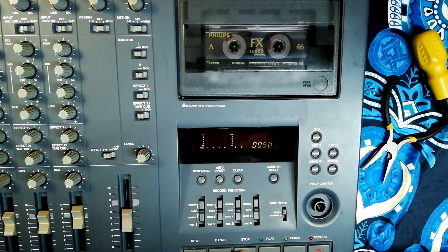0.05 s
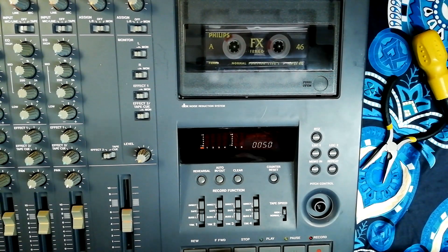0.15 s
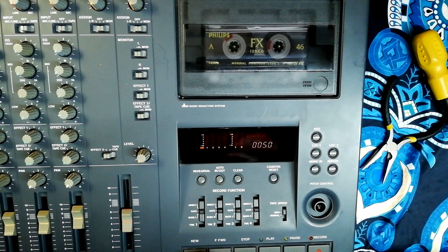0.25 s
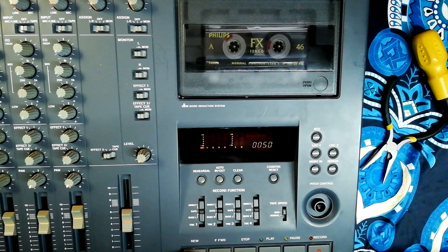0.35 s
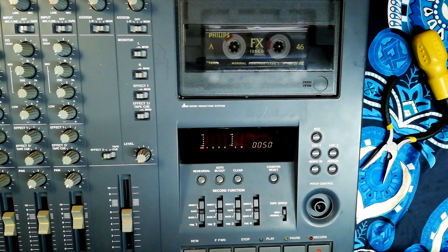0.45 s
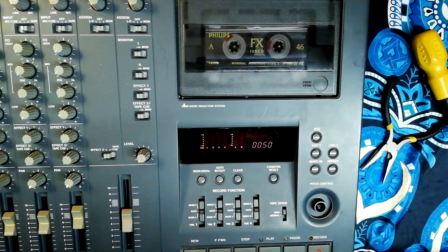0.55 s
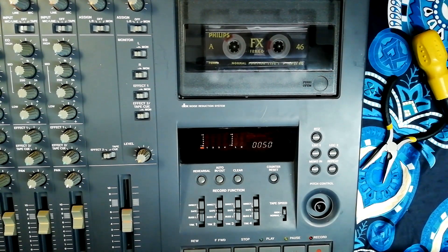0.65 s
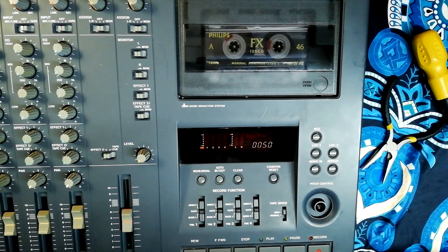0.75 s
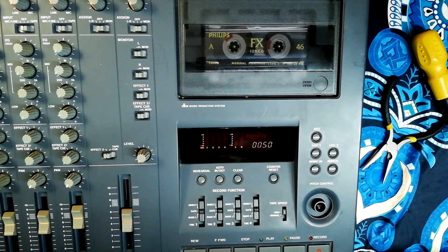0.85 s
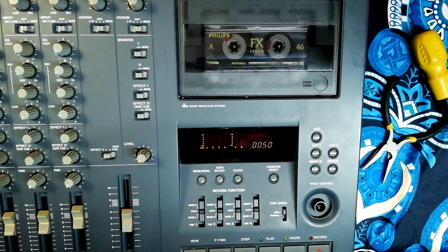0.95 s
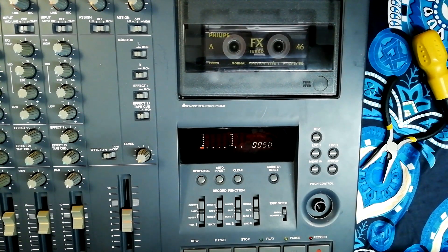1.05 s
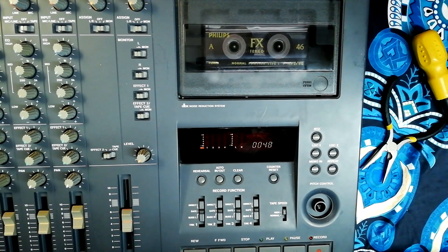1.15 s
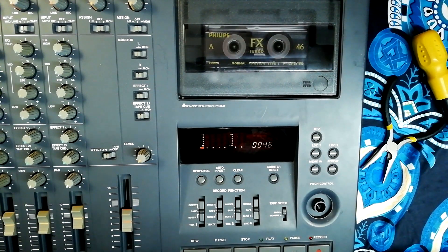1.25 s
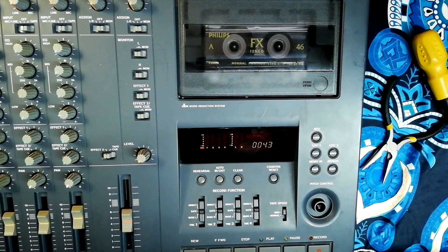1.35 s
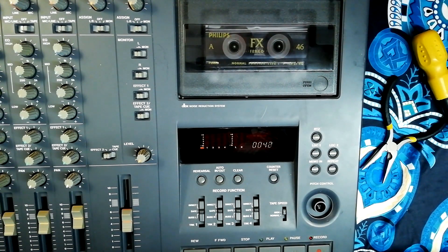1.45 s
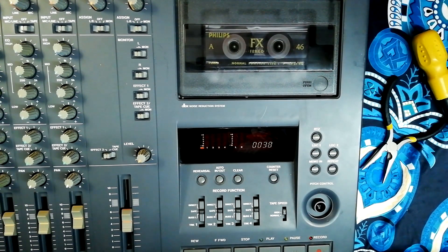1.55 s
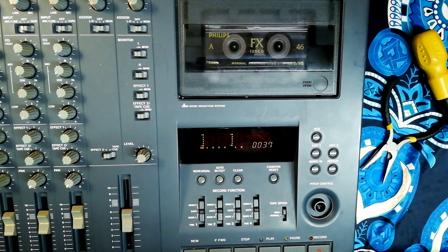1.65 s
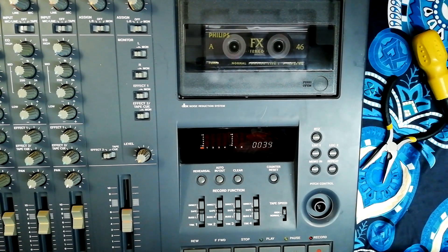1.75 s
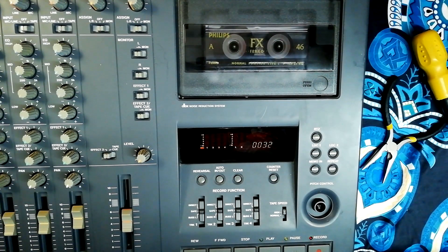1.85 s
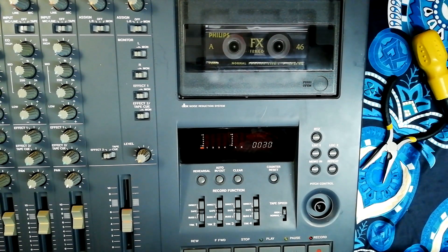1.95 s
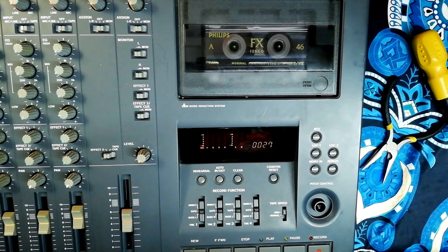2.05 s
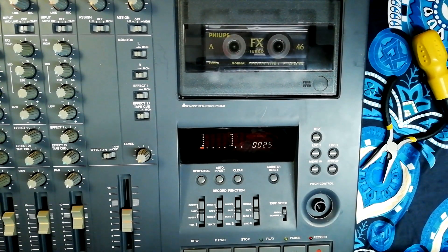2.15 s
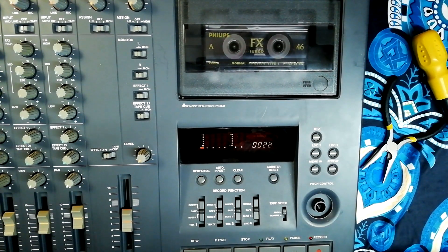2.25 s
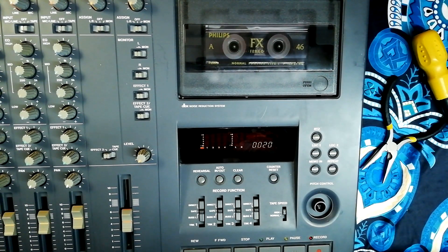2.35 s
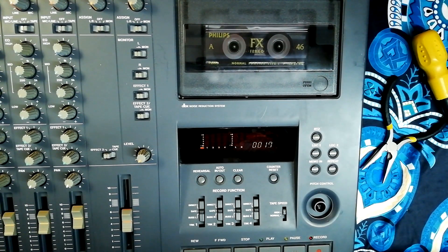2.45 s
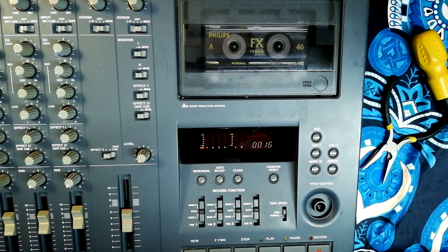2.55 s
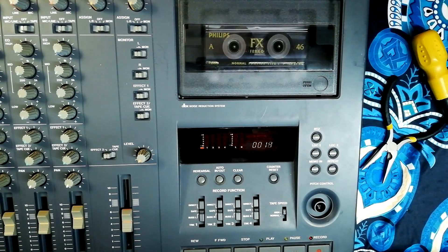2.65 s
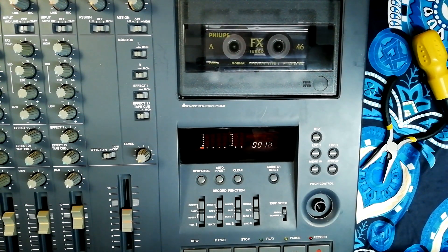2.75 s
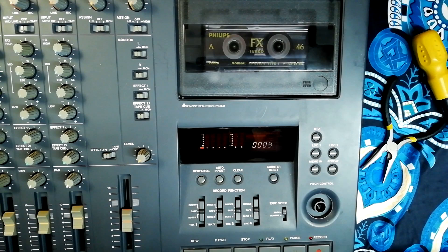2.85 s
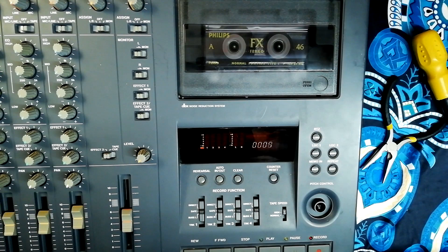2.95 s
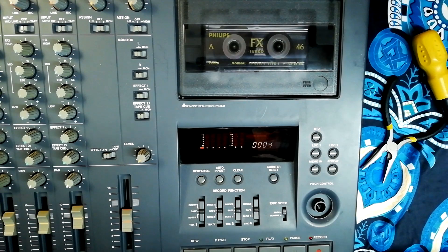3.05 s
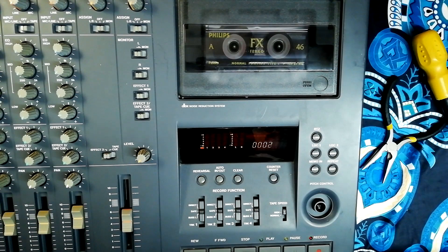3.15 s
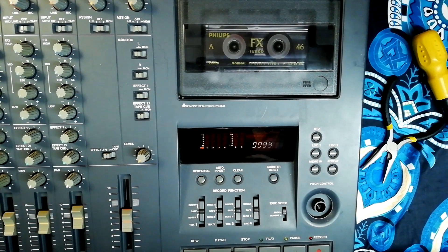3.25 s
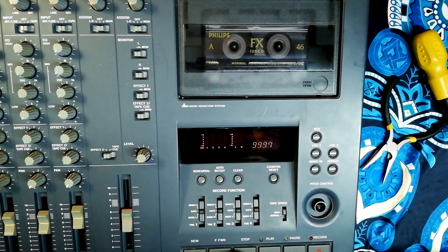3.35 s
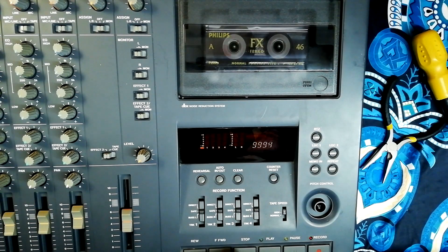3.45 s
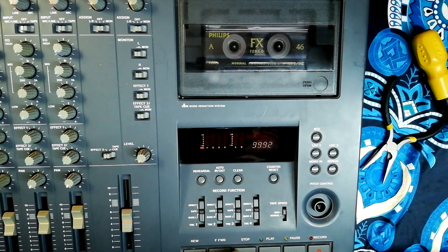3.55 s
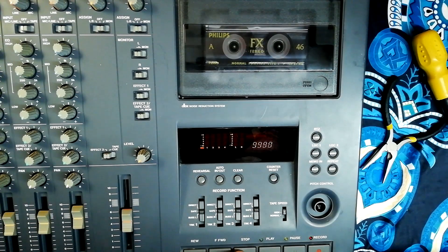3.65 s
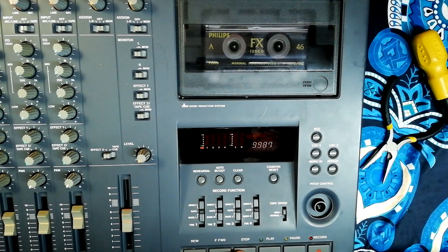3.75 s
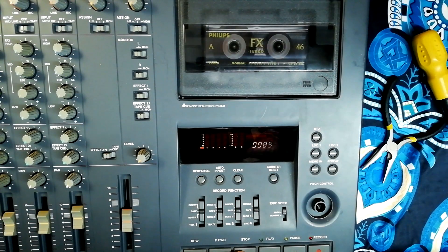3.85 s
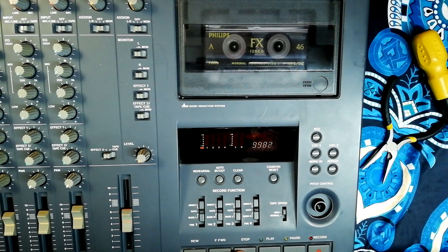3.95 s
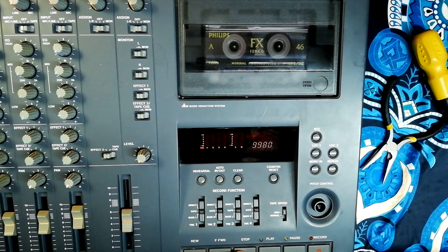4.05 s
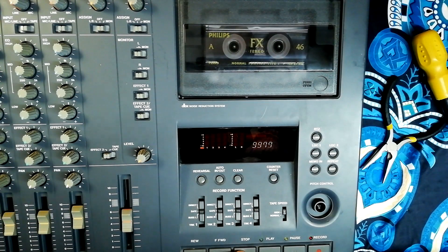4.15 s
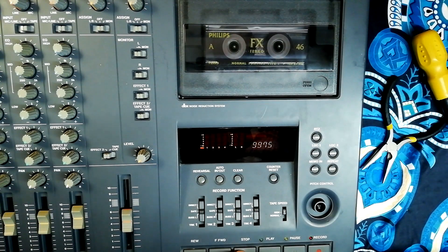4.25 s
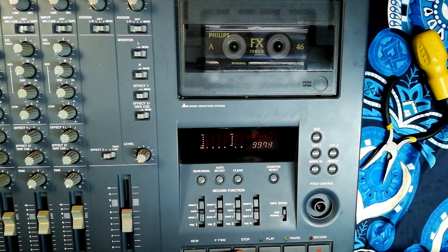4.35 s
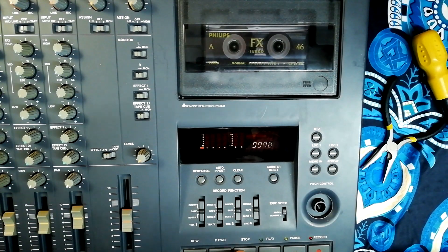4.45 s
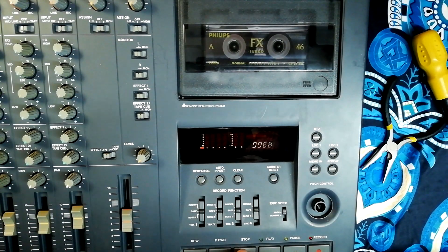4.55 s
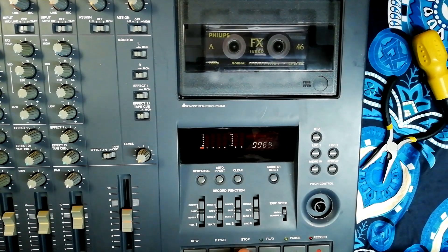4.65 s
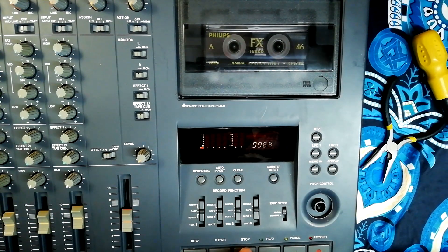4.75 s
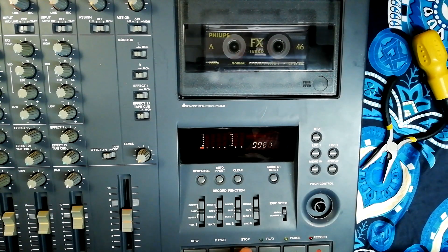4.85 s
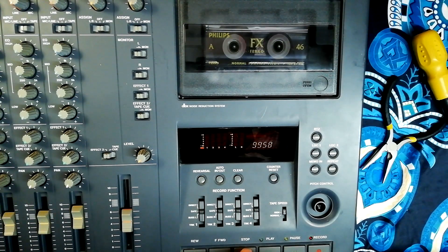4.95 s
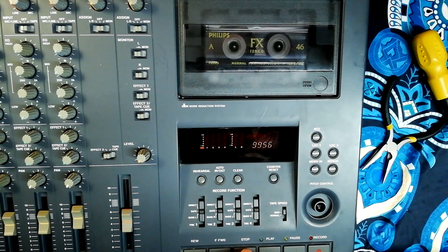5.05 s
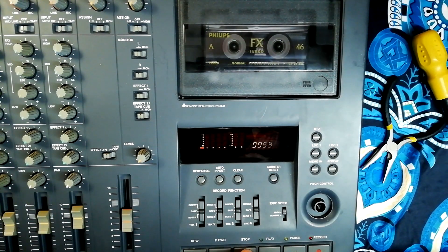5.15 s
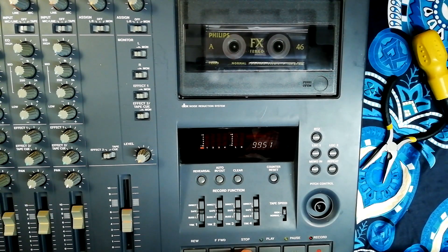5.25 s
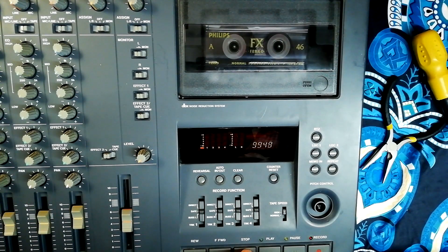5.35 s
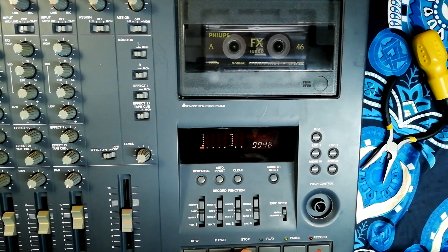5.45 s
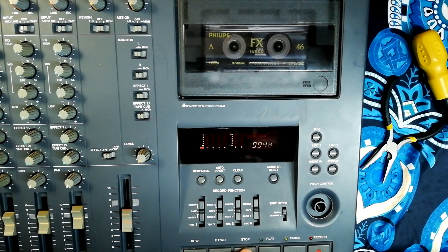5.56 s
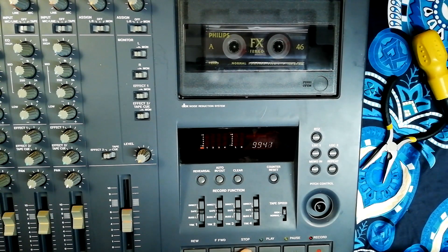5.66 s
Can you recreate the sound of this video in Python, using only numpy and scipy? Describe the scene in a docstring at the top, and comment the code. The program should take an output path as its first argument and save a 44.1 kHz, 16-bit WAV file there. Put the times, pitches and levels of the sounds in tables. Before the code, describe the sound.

A cassette recorder's keys click and clunk, then the tape rewinds with a faint, steady whir in a quiet room.

```python
"""A capstan motor whines for an instant, then a key clacks and stops the tape: a cassette deck
in a quiet room, close to a stereo microphone. Keys, latches and the head carriage knock in the
plastic case, the wind gear scrapes in, and the tape rewinds with a faint whir of gears, hubs
and hiss. The whir slowly brightens as the hubs grow louder, the sound of a reel gaining speed."""
import sys
import numpy as np
from scipy import signal
from scipy.fft import rfft, irfft
from scipy.io import wavfile
from scipy.ndimage import uniform_filter1d

SR = 44100
rng = np.random.default_rng(int(sys.argv[2]) if len(sys.argv) > 2 else 0)


def generate_wav(sig):
    """Save sig (samples, or channels by samples) to the path in sys.argv[1] as 16-bit PCM at SR."""
    pcm = np.round(np.clip(np.atleast_2d(sig).T, -1, 1) * 32767).astype(np.int16)
    wavfile.write(sys.argv[1], SR, pcm)


N = 251347
TIME = np.arange(N) / SR
REWIND_START_S = 1.29

# spectra of the room's still air and of the return from its walls: frequency_hz, gain_db
AIR_SPECTRUM = [(20, -13), (50, -2), (120, -5.5), (250, 0), (420, -7), (560, -11), (700, 1), (1300, 0),
                (3000, -6), (7000, -8.5), (9300, -6.5), (12000, -13.5), (16000, -14)]
WALL_SPECTRUM = [(100, -5.5), (400, 3), (800, -1), (2000, 2.5), (10500, -2.5), (12500, -7), (16000, -7)]
# steady hum in the room: pitch_hz, level_db
HUM_TONES = [(120, -72.5), (400.6, -79), (446.3, -70)]
# partials of the capstan motor in play and in rewind, and of the reel motor: harmonic, level_db
CAPSTAN_PLAY_PARTIALS = [(1, -58), (2, -53), (3, -56.5), (4, -62), (5, -77), (6, -63.5), (7, -78)]
CAPSTAN_IDLE_PARTIALS = [(1, -72.5), (2, -68), (4, -72.5), (6, -76)]
REEL_MOTOR_PARTIALS = [(2, -67), (4, -79)]
# spectra of running tape, sliding levers and struck plastic: frequency_hz, gain_db
TAPE_SPECTRUM = [(150, -10), (400, 2.5), (550, -8.5), (800, -4.5), (1120, -10.5), (1550, -1), (2950, -2.5),
                 (3600, 0), (5900, -3), (7200, -1.5), (8300, -1), (9800, 1), (11200, -8.5), (16000, -16)]
SCRAPE_SPECTRUM = [(200, -15), (450, -11), (750, -4.5), (1400, -2), (2000, -6.5), (3400, -7.5),
                   (5600, -6.5), (9400, 2), (11500, -8), (16000, -23)]
CRACK_SPECTRUM = [(400, -19), (1000, -8), (2200, -5.5), (2900, -15), (3600, -4.5), (5000, -9.5),
                  (5900, -13), (7300, -3.5), (8400, -3), (9700, 2.5), (11200, -3), (13000, -7.5),
                  (16000, -17)]
# spectrum of the shaking case: multiple_of_centre, gain_db
THUD_SPECTRUM = [(.17, -41), (.33, -10), (.55, -4.5), (1.0, -3), (1.5, -5), (2.2, -11), (3.3, -11.5),
                 (6.5, -39)]
# resonances of the deck's parts: pitch_hz, width_hz, gain_db, left_minus_right_db
GEAR_MODES = [(649, 25, -11, -25.5), (1354, 94, -0.5, 2.5), (1530, 97, -2, -1), (1750, 54, -3.5, -3),
              (2019, 25.3, 3.5, 14), (2570, 35, -8, 18), (2713, 16, 1.5, 1)]
HUB_MODES = [(4180, 48, -6.5, -3), (4640, 67, -6.5, -7), (5150, 26, -6, -3), (5460, 55, -5.5, -4),
             (6495, 89, 3, 1.5), (6960, 64, -2.5, -3), (7115, 31, 0, 1), (7720, 96, -2.5, 5),
             (9400, 260, -31, 7), (9590, 380, -22.5, 32)]
TAPE_EDGE_MODES = [(3255, 100, -5, 2), (3465, 95, -1, -9), (3550, 110, -9, -7)]
CHASSIS_MODES = [(650, 50, -11, -10), (876, 100, -3.5, -4), (1003, 69, 0.5, 0), (1355, 61, 4, 1.5),
                 (1706, 66, -5.5, -4), (1767, 53, -4.5, -1), (2024, 83, -11.5, -9), (2350, 110, -11.5, 3)]
KEY_MODES = [(1930, 104, 5.5, -4), (2443, 99, 0, -5), (2810, 150, 0, 4.5), (3280, 170, 1.5, -6),
             (3770, 240, -2, -1), (4530, 140, -7.5, -14), (4890, 170, -1, 7), (7300, 210, -5.5, -9)]
LATCH_SPRING_MODES = [(9100, 140, -12, 14), (9580, 110, 3, 13), (10250, 130, -4.5, 13)]
# swells of the tape edge rubbing on the cassette shell: peak_s, level_db
EDGE_RUBS = [(4.93, -57.5), (5.41, -58)]
# the loudest knocks of a hub in the shell: start_s, relative_level_db
HUB_KNOCKS = [(1.885, -46), (1.911, -38), (3.186, -39.5), (4.275, -48)]
# levers and the wind gear sliding into place: start_s, length_s, scrape_db, chassis_db
LEVER_SLIDES = [(0.1510, 0.0085, -22, -50), (0.225, 0.015, -34, -50), (0.491, 0.014, -37.5, -39),
                (0.982, 0.013, -30.5, -41), (1.2644, 0.03, -26, -48), (1.322, 0.013, -37.5, -40)]
# blows of keys and latches: start_s, case_thud_db, chassis_knock_db, key_ring_db, crack_db, fade_ms
KEY_BLOWS = [(0.1252, -44.5, -39, -26, -26.5, 1.65), (0.155, -32, -29, -29.5, -15.5, 5.7),
             (0.1988, -34.5, -19.5, -40, -17.5, 4.6), (0.2997, -37.5, -44.5, -55, -44, 3.8),
             (0.4775, -68, -61, -48.5, -47.5, 4), (0.5141, -38.5, -39, -39, -37, 3.2),
             (0.7549, -43.5, -33, -27, -25.5, 4), (0.8160, -45.5, -57, -46.5, -50, 5.1),
             (0.9511, -38.5, -34.5, -40.5, -38.5, 3), (0.9895, -31.5, -23, -24, -16.5, 5.6),
             (1.0053, -41, -28, -34.5, -43, 5.4), (1.3075, -36, -52, -50, -36, 1.8),
             (1.3621, -36.5, -33.5, -43.5, -39, 2.6)]


def undb(db):
    """Decibels to gain."""
    return 10 ** (np.asarray(db) / 20)


def unit(x):
    """Scale to rms 1."""
    return x / np.sqrt(np.mean(x ** 2))


def pan(db):
    """Left and right gains, the left louder by db."""
    return undb(np.array([[db], [-db]]) / 2)


def drift(rate_hz):
    """Smooth random drift with a spread near 1."""
    hold = max(int(SR / rate_hz), 2)
    steps = np.repeat(rng.standard_normal(N // hold + 1), hold)
    return unit(uniform_filter1d(uniform_filter1d(steps, hold), hold)[:N])


def wavering_sine(hz, spread, drift_hz):
    """A cycle whose rate wanders around hz."""
    return np.sin(2 * np.pi * np.cumsum(hz * (1 + spread * drift(drift_hz))) / SR)


def noise_pair(side_db, size=N):
    """Left and right noise with a common part and an opposed part."""
    mid, side = rng.standard_normal((2, size))
    return unit(np.array([mid + undb(side_db) * side, mid - undb(side_db) * side]))


def colour(x, spectrum, size=2048):
    """Minimum-phase filter with the given spectrum."""
    hz, db = np.transpose(spectrum)
    bins_hz = np.maximum(np.fft.rfftfreq(size, 1 / SR), 1)
    cepstrum = irfft(np.log(undb(np.interp(np.log(bins_hz), np.log(hz), db))))
    cepstrum[1:size // 2] *= 2
    cepstrum[size // 2 + 1:] = 0
    impulse = irfft(np.exp(rfft(cepstrum)))
    return signal.fftconvolve(x, impulse[None], axes=1)[:, :x.shape[1]]


def ring(x, modes):
    """Resonances in parallel, neighbours in opposite phase, each leaning to one side."""
    out = 0
    for k, (hz, width_hz, db, pan_db) in enumerate(modes):
        mode = signal.lfilter(*signal.iirpeak(hz, hz / width_hz, fs=SR), x)
        out += (-1) ** k * undb(db) * pan(pan_db) * mode
    return out


def excite(noise, force, modes):
    """Noise rings the modes; a steady force of 1 gives rms 1."""
    return ring(noise * (force + 1e-18), modes) / np.std(ring(noise, modes))


def room_tone():
    """Still air around the microphone, a low rumble alike on both sides, and a faint hum."""
    rumble = signal.sosfilt(signal.butter(2, 230, fs=SR, output="sos"), rng.standard_normal(N))
    air = unit(colour(noise_pair(-0.47) + 4 * rumble, AIR_SPECTRUM))
    hum = sum(undb(db + 2.3 * drift(9)) * np.sin(2 * np.pi * hz * TIME) for hz, db in HUM_TONES)
    return undb(-58.5) * air + np.sqrt(2) * hum


def room_reverb(x, tail_t60_s=0.3, boom_t60_s=0.59):
    """Near walls return a short tail with a soft top; one low room mode hangs on."""
    t = TIME[:SR]
    onset = np.clip((t - 0.004) / 0.00099, 0, 1)
    reflections = unit(noise_pair(0.95, SR) * onset * 1000 ** (-t / tail_t60_s))
    tail = undb(-10) * colour(reflections, WALL_SPECTRUM)
    low_mode = ring(noise_pair(-13, SR) * onset * 1000 ** (-t / boom_t60_s), [(214, 65, 0, 0.01)])
    boom = undb(-1) * np.sqrt(np.pi * 45 / SR) * unit(low_mode)
    return signal.fftconvolve(x, (tail + boom) / np.sqrt(SR), axes=1)[:, :N]


def housing(x, inside_db, fade_s, size=1024):
    """Sound rebounds inside the casing and leaves it by other paths to the left and to the right."""
    rebounds = unit(noise_pair(0, size) * np.exp(-TIME[:size] / fade_s))
    paths = undb(inside_db) * rebounds / np.sqrt(size)
    paths[:, 0] += 1  # straight to the microphone
    return signal.fftconvolve(x, paths, axes=1)[:, :N] / np.sqrt(1 + undb(inside_db) ** 2)


def motor_whine(hz, partials, wow, flutter):
    """A small motor whose speed wavers, slowly (wow) and quickly (flutter)."""
    phase = 2 * np.pi * np.cumsum(hz * (1 + wow * drift(4) + flutter * drift(70))) / SR
    return np.sqrt(2) * sum(undb(db + 1.9 * drift(25.2)) * np.sin(k * phase + rng.uniform(0, 2 * np.pi))
                            for k, db in partials)


def tape_playing(stop_s=0.12, run_down_s=0.028):
    """The capstan draws the tape past the head until the stop key lifts it."""
    running = np.exp(-np.maximum(TIME - stop_s, 0) / run_down_s)
    head_rub = undb(-52.5) * unit(colour(noise_pair(-1.3), TAPE_SPECTRUM))
    capstan = motor_whine(434.5, CAPSTAN_PLAY_PARTIALS, wow=0.0034, flutter=0.0095)
    return running * (capstan + head_rub)


def tape_rewinding(spin_up_s=0.059, surge_db=11, surge_fade_s=0.095, rub_half_s=0.051):
    """Gears rattle, hubs chatter once a turn, tape hisses and scrapes its edge, two motors whine."""
    age_s = np.maximum(TIME - REWIND_START_S, 0)
    # a surge while the slack is taken up
    surge = undb(surge_db * np.exp(-np.maximum(age_s - spin_up_s, 0) / surge_fade_s))
    drive = np.minimum(age_s / spin_up_s, 1) * surge
    reel = wavering_sine(hz=21.17, spread=0.0554, drift_hz=2.05)
    pulley = wavering_sine(hz=37, spread=0.024, drift_hz=3.76)
    gears = unit(ring(noise_pair(-11) * undb(3.9 * pulley + 1.05 * drift(60)), GEAR_MODES))
    hub_chatter = noise_pair(-8.5) * undb(1.9 * reel + 1.3 * drift(20) + 2.8 * drift(400))
    hubs = unit(ring(hub_chatter, HUB_MODES))
    edge_friction = noise_pair(-1.5) * undb(4.6 * wavering_sine(hz=70, spread=0.195, drift_hz=30))
    edge = unit(ring(edge_friction, TAPE_EDGE_MODES))
    tape_friction = noise_pair(1) * undb(0.45 * reel + 1.5 * drift(29.88) + 1.6 * drift(900))
    hiss = unit(housing(colour(tape_friction, TAPE_SPECTRUM), inside_db=-8, fade_s=0.005)) * pan(1.7)
    # the emptying reel grows louder, and the edge scrapes harder as the pack grows
    hub_gain = undb(-61.84 + 1.676 * age_s)
    hiss_gain = undb(-52.1 + 0.5145 * age_s)
    swells = sum(undb(db) * np.exp(-((TIME - peak_s) / rub_half_s) ** 2) for peak_s, db in EDGE_RUBS)
    edge_gain = undb(-75.5 + 3.5 * age_s) + swells
    whir = undb(-58.5) * gears + hub_gain * hubs + edge_gain * edge + hiss_gain * hiss
    reel_motor = motor_whine(691, REEL_MOTOR_PARTIALS, wow=0.006, flutter=0.011) * undb(3 * pulley)
    capstan = motor_whine(427.5, CAPSTAN_IDLE_PARTIALS, wow=0.00297, flutter=0.00885)
    return drive * (whir + reel_motor + capstan)


def hub_ticks(faint_per_s=3.3, fade_s=0.0018):
    """Now and then a hub knocks against the shell and rings briefly; fainter knocks come at random."""
    count = int(faint_per_s * (TIME[-1] - REWIND_START_S))
    faint = [(rng.uniform(REWIND_START_S, TIME[-1]), rng.uniform(-54, -48)) for _ in range(count)]
    contact = sum(undb(db) * np.exp(-np.maximum(TIME - start_s, 0) / fade_s) * (TIME >= start_s)
                  for start_s, db in HUB_KNOCKS + faint)
    return undb(2) * excite(noise_pair(-1), contact, HUB_MODES)


def lever_slides(rise_share=0.44, fade_s=0.0075):
    """Levers and the wind gear grate as they slide home, and set the chassis ringing."""
    grating = unit(colour(noise_pair(-1.7) * undb(2 * drift(700)), SCRAPE_SPECTRUM))
    scrape_gain = push = 0
    for start_s, length_s, scrape_db, chassis_db in LEVER_SLIDES:
        rise = np.clip((TIME - start_s) / (rise_share * length_s), 0, 1)
        friction = rise * np.exp(-np.maximum(TIME - start_s - length_s, 0) / fade_s)
        scrape_gain += undb(scrape_db) * friction
        push += undb(chassis_db) * friction
    return grating * scrape_gain + excite(noise_pair(-11), push, CHASSIS_MODES)


def case_thud(shake, centre_hz):
    """The dull sound of the case shaking."""
    spectrum = [(multiple * centre_hz, db) for multiple, db in THUD_SPECTRUM]
    return unit(colour(noise_pair(-16, len(shake)) * shake, spectrum))


def key_blows(rise_ms=0.48, rock_delay_s=0.073, rock_fade_s=0.014, size=8192):
    """A few ms of chattering contact: the case thuds, chassis and keys ring, the plastic cracks."""
    out = np.zeros((2, N + size))
    t = TIME[:size]
    ms = t * 1000
    # the heavy case starts late and shakes on, then rocks back on its feet
    shake = 0.5 * np.exp(-t / 0.025) * (1 - np.exp(-t / 0.0045))
    rock_age_s = np.maximum(t - rock_delay_s, 0)
    rock = rock_age_s * np.exp(-rock_age_s / rock_fade_s)
    for start_s, thud_db, knock_db, key_db, crack_db, fade_ms in KEY_BLOWS:
        contact = np.minimum(ms / rise_ms, 1) * np.exp(-np.maximum(ms - rise_ms, 0) / fade_ms)
        thud = case_thud(contact + shake, centre_hz=255) + undb(-15) * case_thud(rock, centre_hz=190)
        knock = ring(noise_pair(-13, size) * contact, CHASSIS_MODES)
        key = ring(noise_pair(0, size) * contact, KEY_MODES)
        chatter = noise_pair(-0.5, size) * contact
        chatter *= undb(3 * np.repeat(rng.standard_normal(size // 16), 16))
        crack = colour(chatter, CRACK_SPECTRUM) + ring(chatter, LATCH_SPRING_MODES)
        parts = (thud_db, thud), (knock_db, knock), (key_db, key), (crack_db, crack)
        blow = sum(undb(db) * unit(part) for db, part in parts)
        start = int(start_s * SR)
        # levels are those of the energy spread over 10 ms
        out[:, start:start + size] += blow * np.sqrt(0.01 * SR / size)
    return out[:, :N]


def scene():
    """The deck close to the microphone; only its clacks, scrapes and ticks come back off the walls."""
    bed = tape_playing() + tape_rewinding() + room_tone()
    clatter = key_blows() + lever_slides() + hub_ticks()
    return bed + clatter + room_reverb(clatter)


def record(dry, top_hz=15800):
    """A steep low-pass after the microphone cuts the top."""
    return signal.sosfilt(signal.ellip(10, 0.2, 80, top_hz, fs=SR, output="sos"), dry)


dry = scene()
out = record(dry)
generate_wav(out)
```